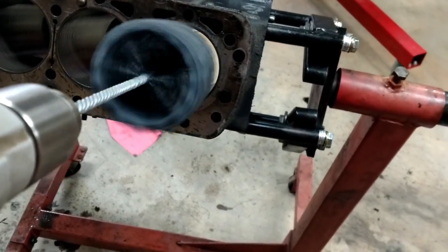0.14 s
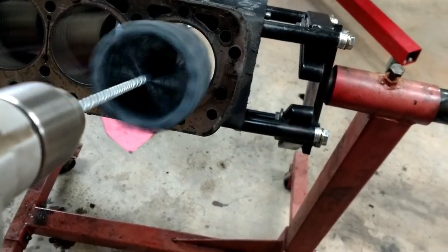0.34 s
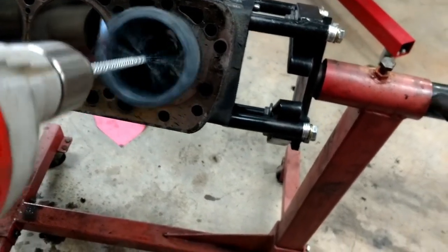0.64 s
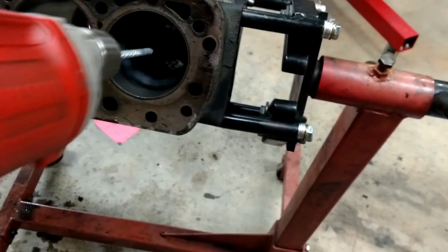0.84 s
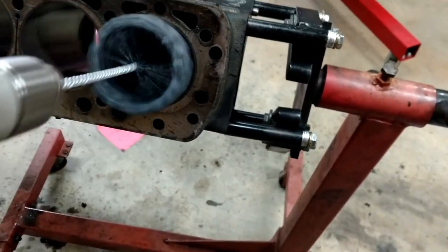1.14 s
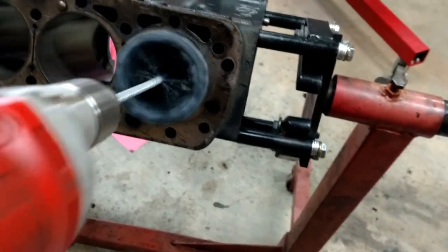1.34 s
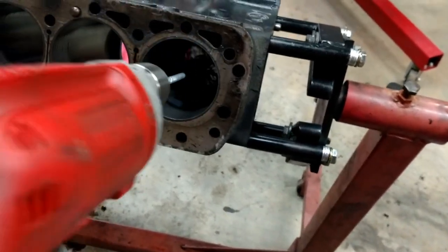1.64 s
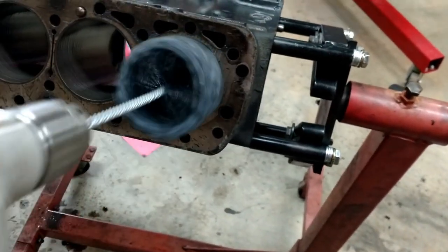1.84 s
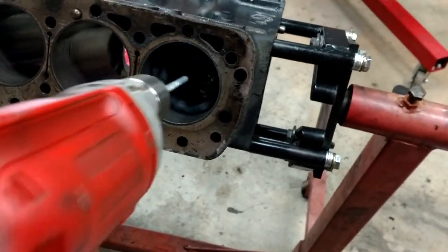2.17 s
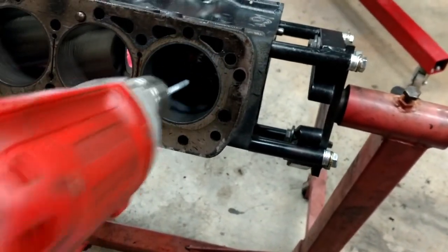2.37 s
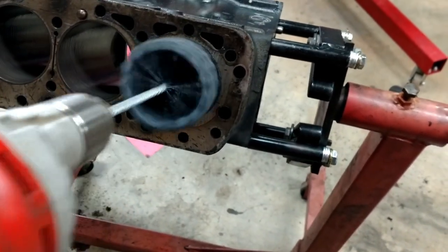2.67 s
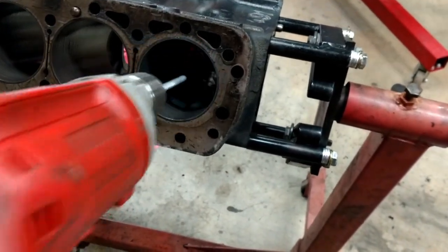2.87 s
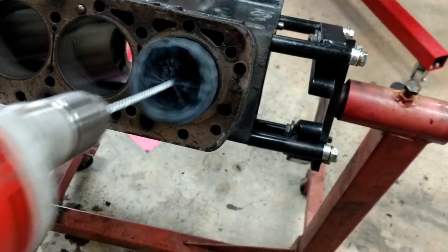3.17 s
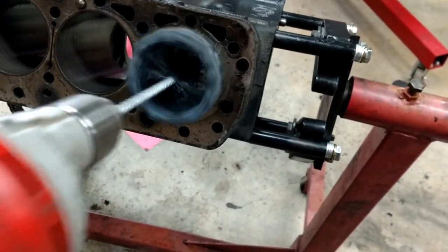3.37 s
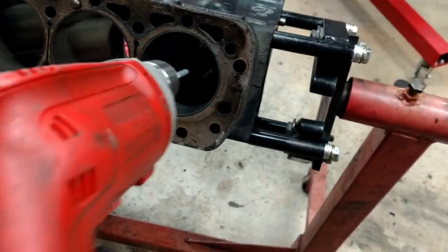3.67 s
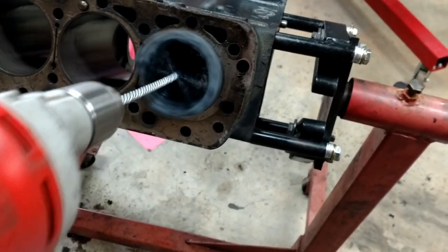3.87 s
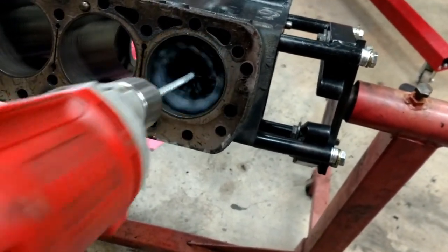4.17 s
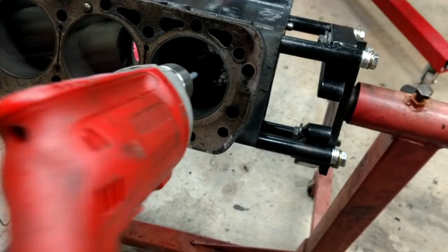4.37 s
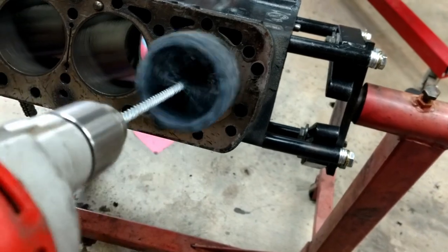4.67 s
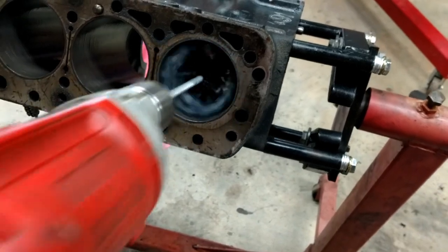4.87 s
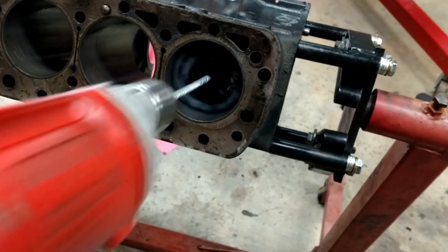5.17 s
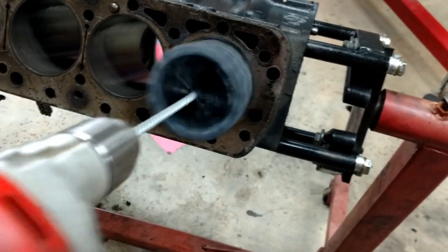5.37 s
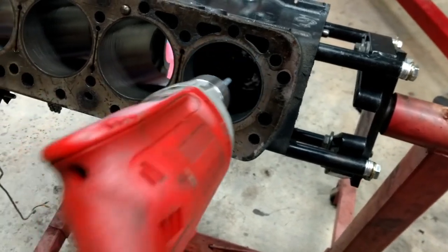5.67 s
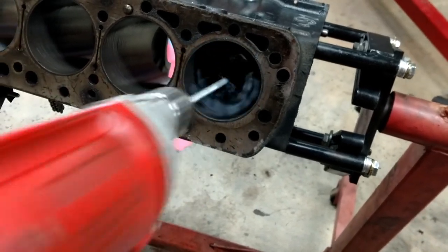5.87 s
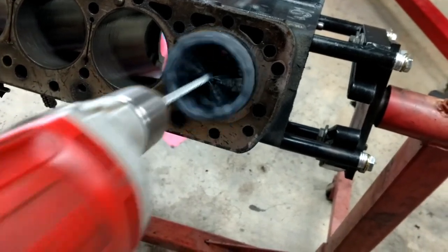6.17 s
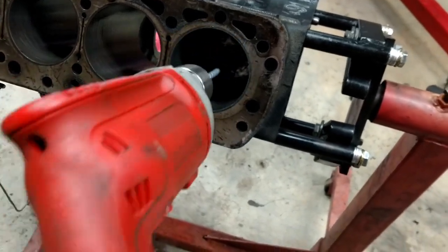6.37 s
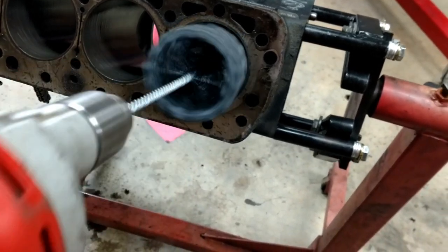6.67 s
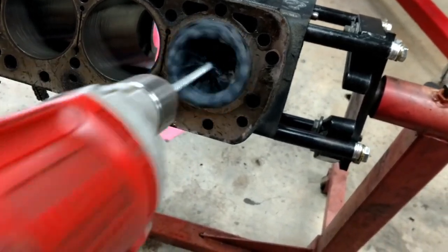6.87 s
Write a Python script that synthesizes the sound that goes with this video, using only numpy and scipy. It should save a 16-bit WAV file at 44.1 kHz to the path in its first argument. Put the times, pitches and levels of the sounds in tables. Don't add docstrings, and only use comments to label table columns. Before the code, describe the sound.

Heard very close in a workshop, a cordless drill revs up loud and open, then drops as its abrasive ball hone bites into an iron cylinder. Quick strokes follow, about three every two seconds, each swelling with gritty hiss and hollow metallic drone. The motor pitch sags at each turn and recovers. Gear knocks, small ticks and air puffs pepper the steady run. Wide handheld stereo.

```python
import sys
import numpy as np
from scipy import signal
from scipy.fft import rfft, irfft
from scipy.io import wavfile
from scipy.ndimage import uniform_filter1d

SR = 44100
rng = np.random.default_rng(int(sys.argv[2]) if len(sys.argv) > 2 else 0)


def elevation(decibels):
    levels = np.asarray(decibels, float)
    return 10 ** (levels / 20)


def generate_wav(signal):
    frames = np.transpose(np.atleast_2d(signal))
    scaled = np.clip(frames, -1, 1) * 32767
    pcm = np.round(scaled).astype(np.int16)
    wavfile.write(sys.argv[1], SR, pcm)


N = 310023
TIME_S = np.arange(N) / SR
HZ = np.maximum(np.fft.rfftfreq(N, 1 / SR), 1)


def rms_one(x):
    return x / np.sqrt(np.mean(x ** 2) + 1e-20)


def noise():
    return rng.standard_normal((2, N))


def in_time(rows):
    s, *columns = np.transpose(rows)
    return [np.interp(TIME_S, s, c) for c in columns]


def at_hz(points):
    hz, values = np.array(points).T
    return np.interp(np.log(HZ), np.log(hz), values)


def drift(rate):
    r = np.exp(-80 * np.pi * rate / SR)
    white = rng.standard_normal(N // 40 + 2002)
    slow = signal.lfilter([1], [1, -2 * r, r * r], white)[2000:]
    return np.interp(np.arange(N) / 40, np.arange(len(slow)), rms_one(slow))


def coloured(x, spectrum):
    return rms_one(irfft(rfft(x) * elevation(at_hz(spectrum)), N))


def bumps(at, width, height):
    t = np.arange(0, N, 50) / SR
    bells = np.exp(-.5 * ((t[:, None] - at) / np.maximum(width, .01)) ** 2)
    return np.interp(TIME_S, t, bells @ height)


def tone(turns, phase):
    return np.sin(2 * np.pi * turns + phase)


# time in seconds, rotor speed in Hz.
RUN_UP = [
    (0.0, 271),
    (.1, 285.6),
    (.3, 313.6),
    (.5, 337),
    (.6, 345),
    (.68, 347),
    (.76, 339),
    (.9, 319),
    (1.1, 296.3),
]
# time in seconds, dragged rotor speed in Hz, recovered speed in Hz.
STROKES = [(1.19, 290, 305), (1.85, 282.6, 300), (2.6, 283.5, 297.3), (3.24, 281.3, 297.3),
           (3.948, 287.1, 298), (4.63, 283, 296), (5.311, 283.7, 295), (6.03, 284.6, 298),
           (6.681, 287.5, 296), (7.38, 291, 298)]


def by_stroke(mean_db, swing_db, peak, free_db):
    turned_s = np.array(STROKES)[:, 0]
    before_s = 2 * turned_s[0] - turned_s[1]
    share = np.interp(TIME_S, np.r_[before_s, turned_s], np.arange(len(turned_s) + 1))
    engaged = .5 + .5 * np.tanh((TIME_S - 0.71) / 0.033)
    swung_db = mean_db + swing_db * np.cos(2 * np.pi * (share - peak))
    return free_db + engaged * (swung_db - free_db)


def rotor():
    recovery_s, settle_s, sag_s, inertia_s = .19, .13, .15, .045
    settle_share, droop_share = .66, .45
    knots = list(RUN_UP)
    for (s, low_hz, high_hz), (following, next_hz, _) in zip(STROKES, STROKES[1:]):
        fall_hz = high_hz - next_hz
        knots += [(s, low_hz), (s + recovery_s, high_hz),
                  (s + recovery_s + settle_s, next_hz + settle_share * fall_hz),
                  (following - sag_s, next_hz + droop_share * fall_hz)]
    speed_hz = in_time(knots + [STROKES[-1][:2]])[0]
    return uniform_filter1d(speed_hz, int(inertia_s * SR), mode="nearest")


# time in seconds, level in dB.
EFFORT = [(0, -32), (.08, -29), (.4, -27), (.6, -29), (.9, -32.5), (1.4, -34.5), (1.9, -34.5), (2.5, -33.5),
          (3.0, -33.5), (3.6, -35.5), (3.9, -34.5), (4.25, -36), (4.55, -34), (5.0, -37.5), (5.7, -33),
          (6.35, -34), (6.68, -32.5), (7.03, -34)]


def effort():
    return in_time(EFFORT)[0]


# time in seconds, width in seconds, hiss in dB, whirr in dB.
SHOVES = [(.65, 0.2, 2, 1.5), (1.04, 0.24, 6, 4), (1.17, 0.036, 2.5, 1.5), (1.32, 0.1, 0, -3),
          (1.45, 0.095, 1.5, 3.5), (1.7, 0.058, 3.5, 2.5), (1.841, 0.025, 9, 2.5), (2.12, 0.11, 2, 1.5),
          (2.36, 0.069, 5, 1.5), (2.62, 0.034, 5.5, 2), (2.8, 0.053, 5.5, 3.5), (3.03, 0.076, 7.5, 1.5),
          (3.14, 0.021, 3, 1), (3.3, 0.05, 6, 2), (3.47, 0.027, 7.5, 3), (3.701, 0.051, 7, 2.5),
          (3.8, 0.028, 6.5, 2), (3.95, 0.058, 5.5, 4), (4.2, 0.041, 3.5, 3.5), (4.42, 0.074, 8.5, 3.5),
          (4.64, 0.034, 6, 0.5), (4.9, 0.021, 2.5, 1.5), (5.1, 0.088, 8.5, 0.5), (5.369, 0.067, 6, 2),
          (5.741, 0.048, 6, 0.5), (5.87, 0.044, 8.5, -2), (6.07, 0.05, 8, 0), (6.27, 0.039, 5.5, 3),
          (6.5, 0.047, 9.5, 1), (6.721, 0.057, 4, -1)]


def shoves():
    at, width, hiss_db, whirr_db = np.transpose(SHOVES)
    return bumps(at, width, hiss_db), bumps(at, width, whirr_db)


# time in seconds, width in seconds, level in dB.
GUSTS = [(.2, 0.37, -57), (1.13, 0.051, -58), (1.38, .04, -61), (1.8, 0.05, -69), (2.8, 0.051, -63),
         (3.95, 0.045, -69), (1.999, 0.011, -38.5), (2.07, 0.029, -40), (3.23, 0.034, -69),
         (3.43, 0.023, -51), (3.54, 0.03, -50), (4.66, 0.031, -62), (5.52, 0.027, -44), (6.218, 0.087, -63),
         (6.97, .1, -61)]
# frequency in Hz, level in dB.
PUFF_COLOUR = [(25, -28), (55, -16), (90, -9), (130, -5), (200, -8.5), (320, -14), (600, -34)]


def puffs(effort_db):
    at, width, gust_db = np.transpose(GUSTS)
    breeze = elevation(effort_db + by_stroke(-54, 18, 0, -54) + drift(3.3))
    air = breeze + bumps(at, width, elevation(gust_db))
    lumps = elevation(np.array([3.4 * drift(32), 1.6 * drift(35)]))
    return air * elevation(7.5) * lumps * coloured(noise(), PUFF_COLOUR)


# frequency in Hz, density in dB per Hz.
MOUTH_MODE = [(1500, -20.5), (1850, -14), (2020, -0.5), (2200, -4.5), (2500, -50)]
# frequency in Hz, width in Hz, mean in dB, swing in dB,
# loudest at share of a stroke, free-running level in dB.
FAINT_BANDS = [(2327, 146, -16.5, 7, .66, -29), (4530, 150, -16.5, 1, .1, -28)]


def mouth(effort_db):
    level_db = effort_db + by_stroke(-13, 8.5, 0.17, -12.5) + 2.5 * drift(8)
    out = elevation(level_db) * coloured(rng.standard_normal(N), MOUTH_MODE)
    for hz, width_hz, *swell in FAINT_BANDS:
        resonance = np.exp(-.5 * ((HZ - hz) / width_hz) ** 2)
        ringing = rms_one(irfft(rfft(rng.standard_normal(N)) * resonance, N))
        out = out + elevation(effort_db + by_stroke(*swell) + 4.4 * drift(4.8)) * ringing
    return out


# frequency in Hz, density in dB per Hz.
DRONE = [(30, -52), (110, -29), (300, -17.5), (600, -13.5), (1000, 2.5), (1250, -1.5), (1600, -22),
         (1950, -21), (2250, -1), (2550, -14), (3000, -11), (4500, -26)]
# frequency in Hz, density in dB per Hz.
UPPER_MODE = [(900, -30.5), (1300, -6.5), (1580, -2), (1800, -7.5), (2050, -38)]


def bore(effort_db, shove_db):
    drone_db = effort_db + 0.019 * (shove_db - 13.0)
    upper_db = by_stroke(-3.5, 1, 0.64, -1)
    lower = coloured(noise(), DRONE)
    lower[1] *= elevation(-(uniform_filter1d(upper_db, SR // 8) + 5))
    upper = elevation(upper_db + 2.5) * coloured(noise(), UPPER_MODE)
    return elevation(drone_db - 0.5 + 1.06 * drift(11.2)) * (lower + upper)


# time in seconds, peak in dB, left over right in dB.
TICKS = [(0.9393, -19, 2.5), (1.2451, -23, 4.5), (1.4416, -19, 2.5), (1.8058, -20, 4.0), (1.8597, -21, 3.0),
         (2.1536, -10, 2.0), (2.8449, -23, 3.0), (3.9634, -24, 3.0), (3.9828, -19, 3.0), (5.2899, -25, 3.0),
         (5.7603, -22, 3.0), (6.2527, -23, 3.0), (6.4278, -23, 3.0), (2.7786, -18, 3.0), (3.2545, -15, 2.5),
         (3.2789, -17, 3.5), (3.4545, -21, 3.5), (4.5984, -22, 4.0), (4.7222, -25, 4.0), (4.8893, -19, 2.5),
         (5.7144, -19, 1.0), (5.9838, -24, 4.5), (6.1025, -20, 3.0)]


def ticks():
    at, peak_db, pan_db = np.transpose(TICKS)
    clicks = np.zeros((2, N))
    clicks[:, np.round(at * SR).astype(int)] = elevation(peak_db + 9 + np.outer([.5, -.5], pan_db))
    return signal.sosfilt(signal.butter(2, 5000, "high", fs=SR, output="sos"), clicks)


def grains(per_s, spread_db):
    sizes_db = spread_db * np.minimum(rng.exponential(1, (2, N)), 4.5)
    signs = rng.choice([-1, 1], (2, N))
    return elevation(sizes_db) * signs * (rng.random((2, N)) < per_s / SR)


# frequency in Hz, level in dB.
GRIT = [(1500, -24), (4000, -3), (6000, -4), (7500, 0), (9000, 3.5), (11000, -0.5), (13000, -3),
        (15800, -8)]


def hone(effort_db, shove_db):
    hiss_db = effort_db + by_stroke(-8, 0, 0, -8.5) + shove_db
    pressure = elevation(1.3 * (hiss_db - uniform_filter1d(hiss_db, SR)))
    scratch = coloured(grains(700 * pressure, spread_db=4.5), GRIT)
    hiss = coloured(noise(), GRIT)
    return elevation(hiss_db + 7.5 + 0.8 * drift(25)) * (0.73 * hiss + 0.46 * scratch)


# time in seconds, level in dB.
BARE = [
    (0, -38),
    (.35, -31.5),
    (.6, -36),
    (.85, -51),
    (1.15, -45),
    (1.3, -79),
    (7.03, -82),
]
# frequency in Hz, level in dB.
BARE_COLOUR = [(40, -48), (130, -26), (300, 1), (500, 3.5), (750, -1), (1200, -8), (3000, -2.5),
               (5500, -25), (8500, -11), (12000, -21), (16000, -39)]
# multiple of rotor speed, level in dB.
BARE_HUM = [(1, -8), (2.57, -3)]
# frequency in Hz, level in dB against the bare drill.
MAINS = [(180, -20)]


def bare_drill(turns):
    out = coloured(noise(), BARE_COLOUR)
    for k, db in BARE_HUM:
        out = out + elevation(db + 1.2 * drift(6) - 1) * tone(k * turns, .3 * drift(8))
    for hz, db in MAINS:
        out = out + elevation(db + 2.2 * drift(5.8)) * tone(hz * TIME_S, 0)
    return elevation(in_time(BARE)[0]) * out


WHINE_ORDERS = [8, 24, 39, 48]
# dB at the left port, dB in the reflected copy.
WHINE_REACH = [(-2, -8), (-4, -10), (-1, -5), (-4, -4)]
# mean in dB, swing in dB,
# loudest at share of a stroke, free-running level in dB.
WHINE_SWELL = [(-42, 4, .05, -60), (-43, 9, .11, -30), (-47, 4, .36, -47), (-48.5, 6, .55, -56)]


def whine(turns, effort_db):
    bite_db, start_db = [13, 12, 5, -12], [0, 7, 2, 10]
    nearness_db = np.minimum(effort_db - np.median(effort_db), 2)
    out = np.zeros((2, N))
    for k, reach_db, swell, bite, start in zip(WHINE_ORDERS, WHINE_REACH, WHINE_SWELL, bite_db, start_db):
        level_db = by_stroke(*swell) + .5 * nearness_db
        level_db = level_db + bumps([.83], .13, [bite]) + bumps([0], .12, [start])
        wobble = (.25 + .04 * k) * drift(30) + .12 * k * drift(4)
        level = np.sqrt(2) * elevation(level_db + 3 * drift(12)) * elevation(np.array(reach_db))[:, None]
        out += level * tone(k * turns, wobble + rng.uniform(0, 1.7, (2, 1)))
    return out


# frequency in Hz, level in dB.
WHIRR = [(2000, -22), (2300, -8), (2550, -5), (2900, -4), (3500, -0.5), (4100, -9), (5000, -2.5), (6500, 0),
         (8000, -4.5), (10000, -8.5), (14000, -46)]
# time in seconds, hardness in dB.
KNOCKS = [(0.0245, 8.5), (0.0578, 7.5), (0.0748, 2), (0.1246, 4), (0.1585, 8), (0.2404, -9), (0.4184, -14),
          (0.5487, -7), (0.9482, 4), (1.0321, 6), (1.125, 8), (1.4, -8), (1.843, 5), (2.2, -12), (2.743, 7),
          (3.21, 1), (3.2495, 3.5), (3.4915, 11), (3.5239, 10), (3.7, -3), (3.8591, 3), (3.959, 8.5),
          (4.1425, -7), (4.626, 2), (5.0, -10), (5.327, 5.5), (5.3906, 1), (5.443, 6), (5.7, -7),
          (5.9763, 1), (6.043, 12), (6.5011, -23), (6.6433, 9), (6.691, 10.5), (6.788, 0), (6.8433, 6)]
# multiple of rotor speed, level in dB against the whirr.
HUM = [(.625, -35), (1, -27), (2, -34), (9, -28), (12, -26), (16, -27), (26, -30), (30, -32)]


def planet_knocks(turns):
    per_turn, ring_hz, t60_s = .213, 3327, 0.0057
    at, hard_db = np.transpose(KNOCKS)
    due = per_turn * turns[(at * SR).astype(int)]
    slip, hard_db = in_time(np.transpose([at, np.round(due + .5) - .5 - due, hard_db]))
    steps = np.diff(np.floor(per_turn * turns + slip + .5), prepend=0)
    steps = steps * elevation(hard_db + rng.normal(0, 1.5, N))
    r, w = elevation(-60 / (t60_s * SR)), 2 * np.pi * ring_hz / SR
    ring = [1, -2 * r * np.cos(w), r * r]
    casing = np.convolve(ring, ring)
    return rms_one(signal.lfilter([1, 0, -1], casing, steps + 1e-18))


def gearbox(turns, rotor_hz, effort_db, whirr_shove_db):
    whirr_db = effort_db + by_stroke(-2.5, 1, 0.16, 1.5) + whirr_shove_db
    throb = 1 + 0.14 * np.cos(4 * np.pi * turns)
    teeth = coloured(throb * noise(), WHIRR) * elevation(0.57 * drift(17.6))
    load_db = np.clip(.9 * (288.3 - rotor_hz), -12, 4)
    knock = elevation(load_db - 16.0) * planet_knocks(turns)
    hum = sum(elevation(db + 4 * drift(9) - 2) * tone(k * turns, rng.uniform(0, 9)) for k, db in HUM)
    return elevation(whirr_db + 3.0) * (teeth + knock + np.sqrt(2) * hum)


# frequency in Hz, likeness from 0 to 1 (clipped).
LIKENESS = [(100, 0.94), (600, 0.76), (1100, 0.7), (1650, 1.73), (1950, -0.15), (3600, -0.58), (5600, .5),
            (7500, 1), (10000, -0.04), (16000, 0.5)]
# frequency in Hz, likeness from 0 to 1.
NEAR_LIKENESS = [(100, 0.6), (600, 1), (1500, 1), (2100, 0.04), (4000, 0), (5600, 0.75), (8000, 1),
                 (12000, 0.1), (16000, .2)]
# frequency in Hz, left over right in dB.
SHADOW = [(200, -0.5), (550, 2), (1000, 0), (1450, 6), (1900, -4.5), (2450, 6.5), (3500, -1), (5000, 3.5),
          (6200, 11.5), (9000, 5), (13000, 0.5), (15500, 0)]


def at_ports(drill, drone, swing, nearness):
    swung = np.interp(np.arange(N) - .00007 * SR * swing, np.arange(N), drone[0])
    late = rfft(drill[0] + swung) * np.exp(-2j * np.pi * HZ * 0.0002785)
    diffuse = rfft(drill[1] + drone[1])
    rights = []
    for likeness in (LIKENESS, NEAR_LIKENESS):
        alike = np.clip(at_hz(likeness), 0, 1)
        mixed = alike * late + np.sqrt(1 - alike ** 2) * diffuse
        rights.append(irfft(mixed * elevation(-at_hz(SHADOW)), N))
    far, near = rights
    return np.array([drill[0] + drone[0], far + nearness * (near - far)])


# frequency in Hz, loss in dB.
TURNED_LOSS = [(200, 7), (700, 2.4), (1450, 11), (2200, 2.6), (3500, 9.7), (5500, 3.9), (8800, 17),
               (11500, 4.4), (13500, 0.83)]


def turned_away(ports, turned):
    left, right = ports
    shaded = irfft(rfft(right) * elevation(-at_hz(TURNED_LOSS)), N)
    return np.array([left, right + np.clip(turned, 0, 1) * (shaded - right)])


# time in seconds, share from 0 to 1.
TURNED = [(0, 1), (.6, .9), (.95, .1), (1.3, 0), (7.03, 0)]


def scene():
    rotor_hz, effort_db = rotor(), effort()
    turns = np.cumsum(rotor_hz) / SR
    shove_db, whirr_shove_db = shoves()
    swing, turned = by_stroke(0, 0.61, 0.15, 0), in_time(TURNED)[0]
    drone = bore(effort_db, shove_db)
    drill = hone(effort_db, shove_db) + bare_drill(turns) + whine(turns, effort_db)
    drill = drill + gearbox(turns, rotor_hz, effort_db, whirr_shove_db)
    ports = at_ports(drill, drone, swing, turned)
    ports = ports * elevation(np.outer([.5, -.5], 2 * swing))
    return turned_away(ports, turned) + ticks() + puffs(effort_db) + mouth(effort_db)


def top_cut(x):
    return signal.sosfilt(signal.butter(12, 16930, fs=SR, output="sos"), x)


# time in seconds, quick part in dB, slow part in dB.
DUCKS = [
    (1.195, 4, 0.5),
    (1.496, 1, 3.5),
    (1.864, 0, 2),
    (2.159, -6, 10),
    (3.985, 1, 2),
    (4.666, 0.5, 5.5),
    (5.769, -2, 6.5),
]
# frequency in Hz, share fed to the other side.
CROSS = [(50, .86), (1100, .95), (2200, .92), (3300, .76), (4500, .82), (5600, .68), (6700, .55),
         (7800, .3), (8800, .02), (20000, .01)]


def record(dry):
    duck_db = 0
    for s, quick_db, slow_db in DUCKS:
        since_s = np.abs(TIME_S - s)
        recovery_db = quick_db * np.exp(-since_s / 0.062) + slow_db * np.exp(-since_s / 0.33)
        duck_db = duck_db + (TIME_S > s) * recovery_db
    ports = rfft(dry * elevation(-duck_db)) * (HZ < 15750)
    cross = at_hz(CROSS) * np.exp(-2j * np.pi * HZ * 20 / SR)
    return top_cut(irfft(ports - cross * ports[::-1], N))


dry = scene()
out = record(dry)
generate_wav(out)
```